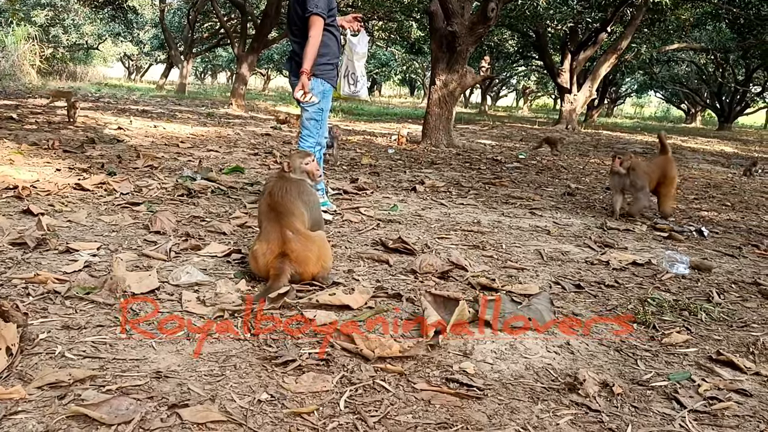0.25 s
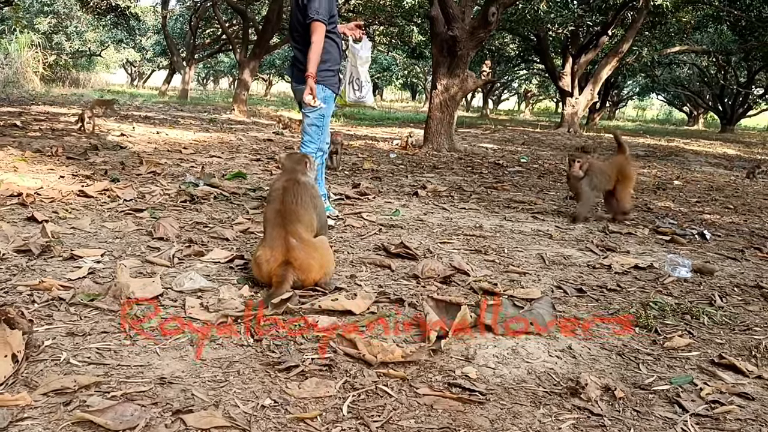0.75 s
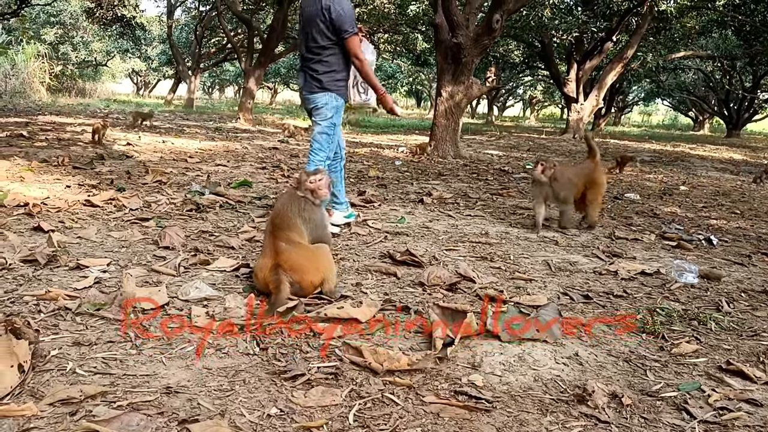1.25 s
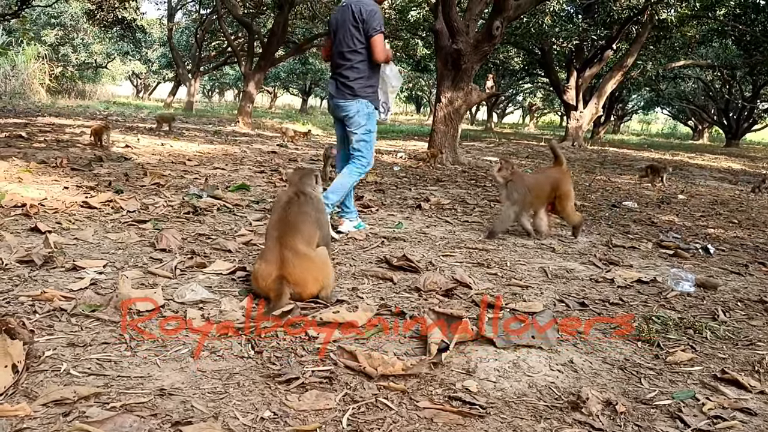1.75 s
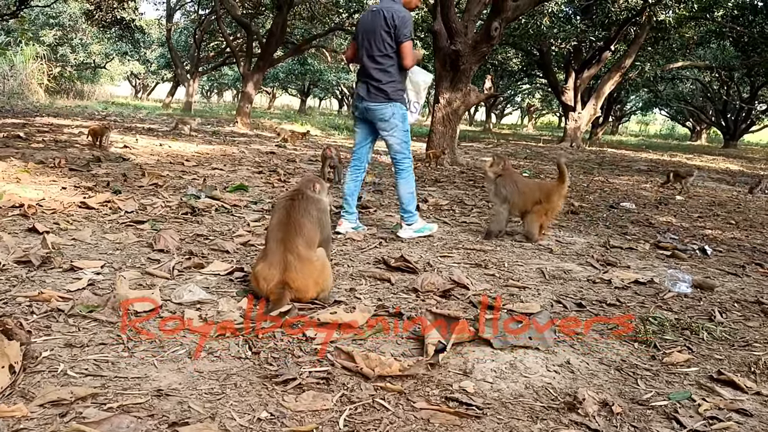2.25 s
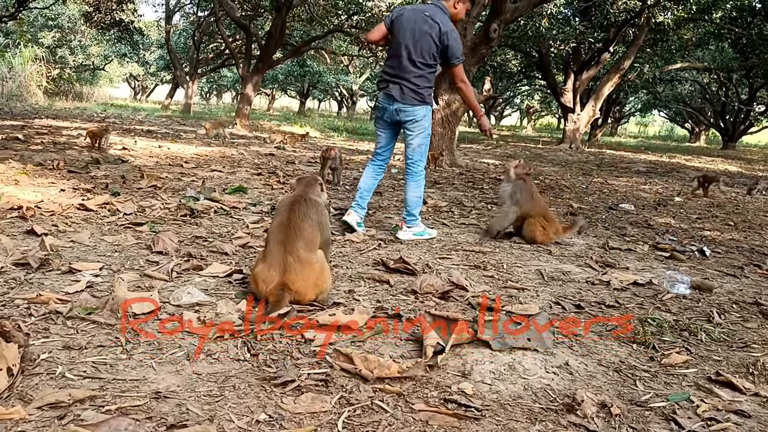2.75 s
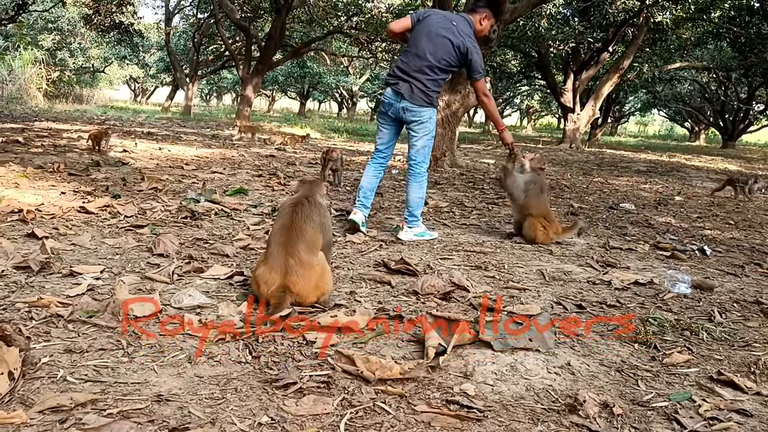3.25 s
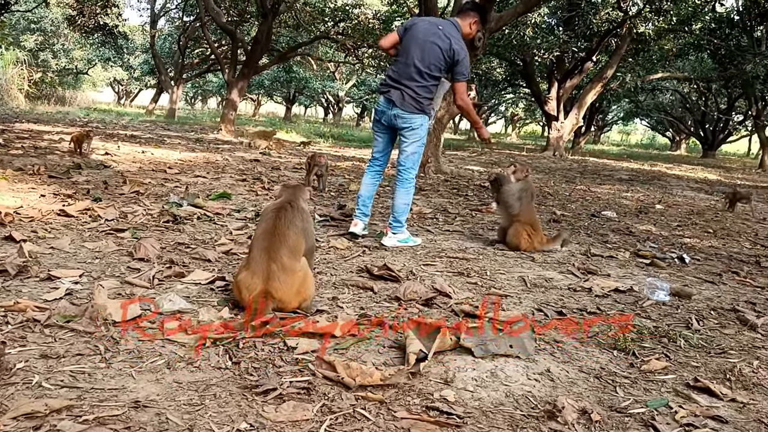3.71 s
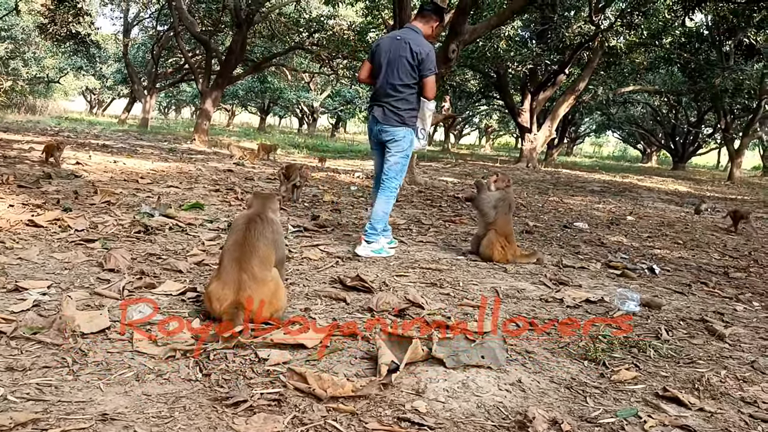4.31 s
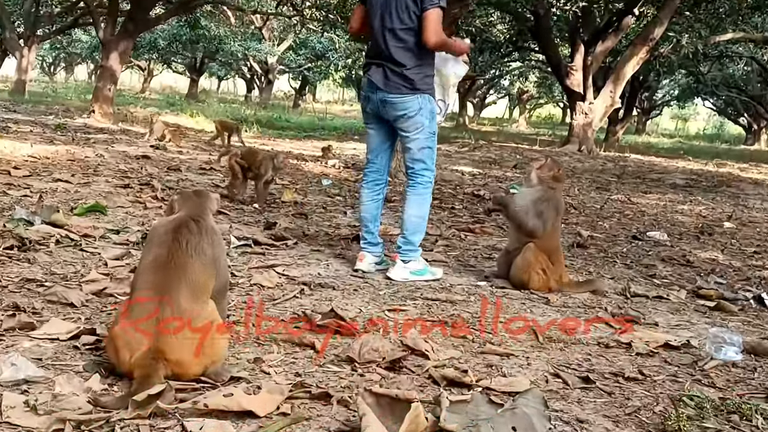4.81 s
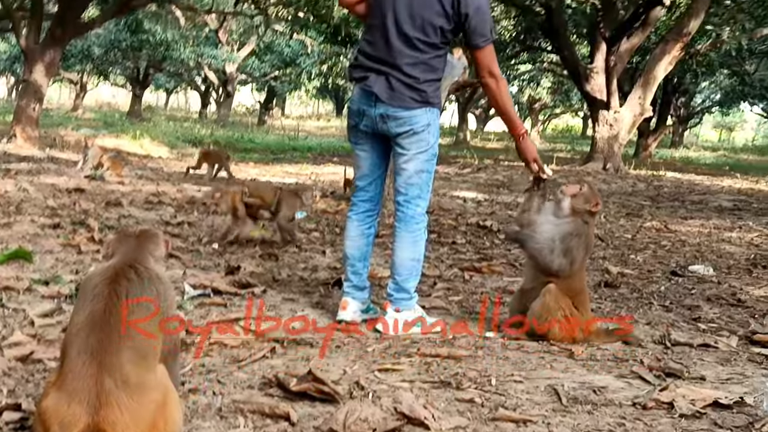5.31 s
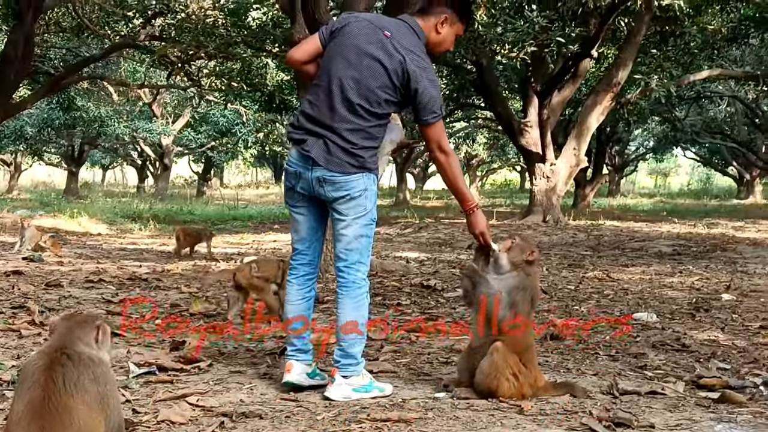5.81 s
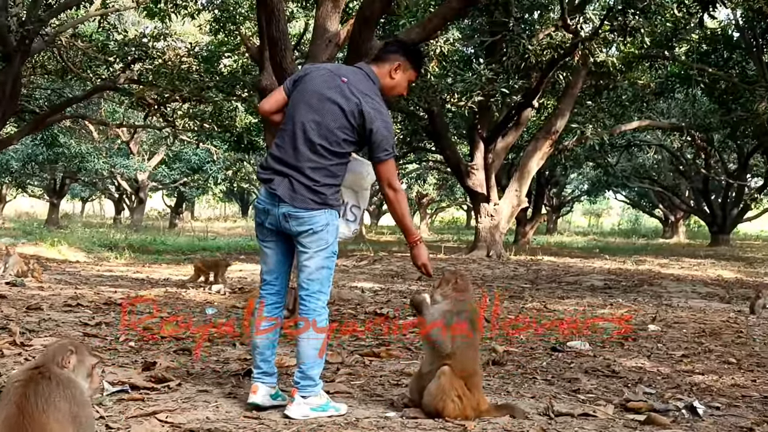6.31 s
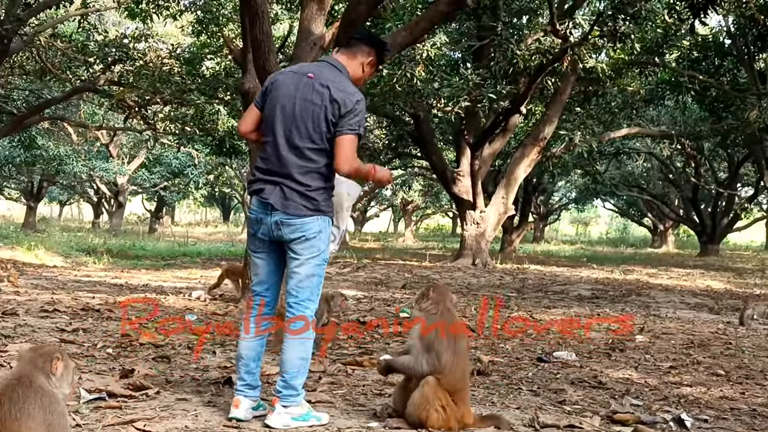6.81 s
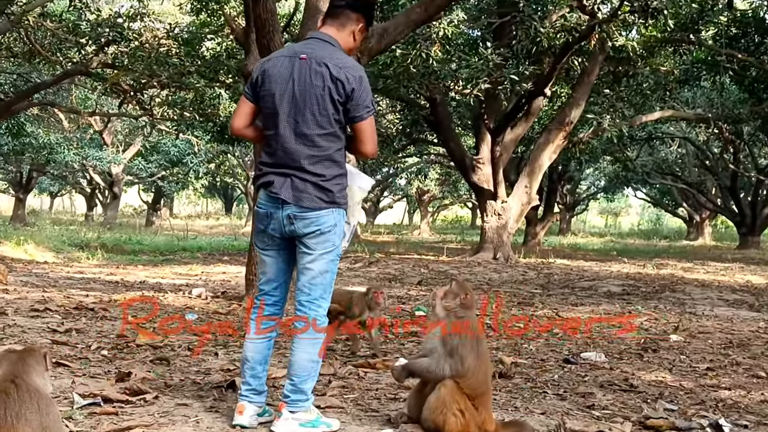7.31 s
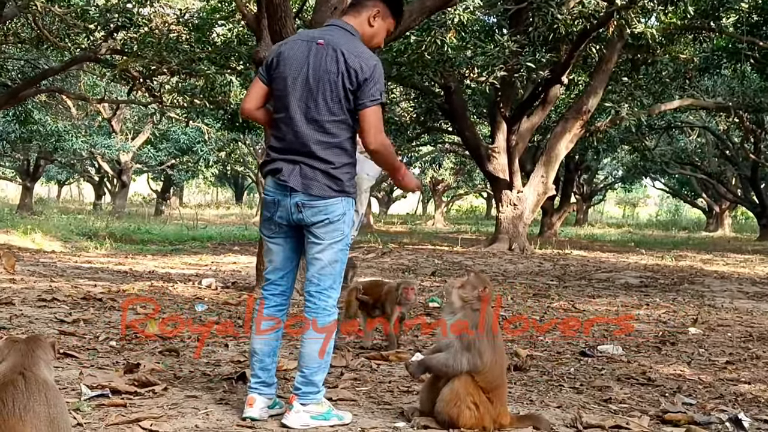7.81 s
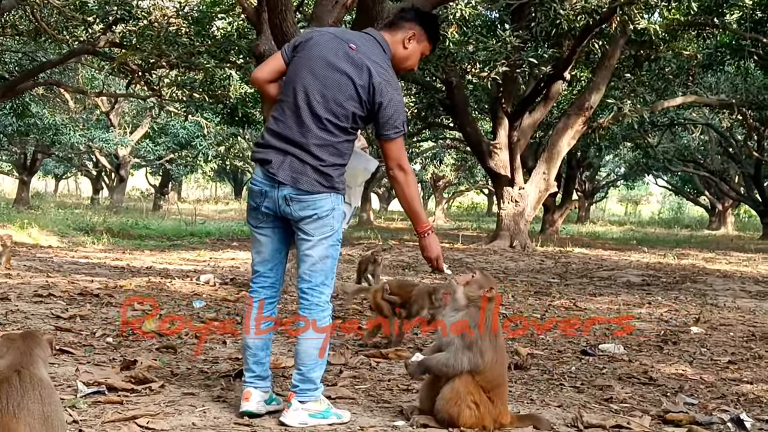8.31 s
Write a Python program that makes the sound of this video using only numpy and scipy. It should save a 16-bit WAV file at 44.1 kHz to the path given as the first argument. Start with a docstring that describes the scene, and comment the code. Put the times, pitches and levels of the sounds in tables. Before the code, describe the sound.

A quiet orchard with rustling canopy, short echoes among trees and a faint idling engine far away. A monkey coo is already fading at 0 s; clear arched coos follow around 1.1, 1.6 and 2.8 s, with tiny squeaks at 1.1 and 2.1. Dry leaves scuff lightly, strongest early near 1.5, and a twig snaps sharply at 2.0. A thin fluttering insect buzzes in bouts from 2.9 to 5 s. Two tiny shrill yelps flick by at 3.4, a lower coo at 3.6, leaf crunch at 4.3, another coo at 4.4, then a breathy squeal breaking into a yelp at 4.9. Coos return at 6.3 and, higher and brief, at 7.9. Faint birds chirp throughout, with a clearer peep at 7.3. The hand-covered right microphone rumbles and thumps, notably at 0.2, 3.0, 6.3 and 8.3. The engine swells gently; leaves and twigs crackle loudly at 8.3.

```python
"""An orchard through two microphone ports: the left is open, a hand covers the right and muffles it.
From the start monkeys coo in bent arches, dry leaves crackle underfoot, the canopy rustles and an engine
idles far off as pulses in a pipe. The grip rumbles on the covered port and fingers bump the case.
Twigs snap as short rings, then small birds sing gliding tones and squeaks pass; near 2.9 s an insect buzzes.
From 3.4 s monkeys yelp and squeal in fluttering partials with breath; the engine is nearest at the end."""
import sys
import numpy as np
from scipy import signal
from scipy.fft import rfft, irfft, next_fast_len
from scipy.io import wavfile
from scipy.ndimage import uniform_filter1d, map_coordinates

SR = 44100
rng = np.random.default_rng(int(sys.argv[2]) if len(sys.argv) > 2 else 0)


def decibels_to_gain(level_db):
    """Convert a level in decibels to a linear amplitude gain (20 dB per decade)."""
    exponent = np.asarray(level_db, float) / 20
    return 10 ** exponent


def generate_wav(sig):
    """Save sig (samples, or channels by samples) to the path in sys.argv[1] as 16-bit PCM at SR."""
    pcm = np.round(np.clip(np.atleast_2d(sig).T, -1, 1) * 32767).astype(np.int16)
    wavfile.write(sys.argv[1], SR, pcm)


N = 377055
TIME = np.arange(N) / SR

# Colours of dry leaves underfoot, in low, middle and treble bands: (frequency [Hz], relative level [dB per Hz])
LEAF_BANDS = [
    [(700, -9.5), (1100, 15), (1900, 13.5), (2300, -36)],
    [(1700, -10.5), (2200, -1.5), (3600, 9), (4400, 1.5), (5200, -20), (7000, -37.5), (8000, -72.5)],
    [(7500, -27.5), (10000, 14.5), (13000, 32.5), (16000, -14.5)],
]


def unit(x):
    """Scales a signal to rms 1."""
    return x / np.sqrt(np.mean(x ** 2) + 1e-20)


def along(points, hz):
    """Interpolates (Hz, value) points on a log frequency axis."""
    f, v = np.transpose(points)
    return np.interp(np.log(hz + 1), np.log(f + 1), v)


def curves(rows, t=TIME):
    """Gives one value per sample for each column after the time."""
    s, *cols = np.transpose(rows)
    return [np.interp(t, s, c) for c in cols]


def wobble(rate, size=N):
    """Draws a smooth random curve with rate knots a second, at most 2000."""
    knots = rng.standard_normal(int(size * 2000 / SR) + 9)
    return map_coordinates(knots, [np.arange(size) * min(rate, 2000) / SR])


def filtered(x, response):
    """Multiplies the spectrum of x by a response of frequency."""
    m = next_fast_len(N + 8192)
    return irfft(rfft(x, m) * response(np.fft.rfftfreq(m, 1 / SR)), m)[..., :N]


def noise(spectrum):
    """Makes noise of rms 1 with the given colour."""
    return unit(filtered(rng.standard_normal(N), lambda hz: decibels_to_gain(along(spectrum, hz))))


def patchy(x, patchy_db):
    """Varies the gain in random patches of time and frequency."""
    z = signal.stft(x, nperseg=1024)[2]
    field = uniform_filter1d(rng.standard_normal(z.shape), 7, 0)
    field = uniform_filter1d(field, 9, 1)
    return signal.istft(z * decibels_to_gain(patchy_db * unit(field)), nperseg=1024)[1][:N]


def notes(tables, voice, fade, glide):
    """Plays each table with a voice; the pitch rounds its corners over glide seconds."""
    out = np.zeros(N + SR)
    for rows in tables:
        start, end = rows[0][0], rows[-1][0] + fade
        t = np.arange(round(start * SR), round(end * SR)) / SR
        hz, *cols = curves(rows, t)
        hz = uniform_filter1d(hz, 1 + int(glide * SR), mode="nearest")
        edge = np.clip(np.minimum(t - start + 1 / SR, end - t) / fade, 0, 1)
        phase = 2 * np.pi * np.cumsum(hz) / SR
        out[round(start * SR):][:len(t)] += edge * voice(phase, hz, *cols)
    return out[:N]


def coo(phase, hz, db, overtones_db, loss_db):
    """A clean tone with a slight tremor; the mouth colours its three overtones."""
    # Mouth: (frequency [Hz], gain on overtones [dB])
    mouth = [(1300, -1), (1900, -3), (2350, 0.5), (2750, -6), (3400, 8), (3800, 1), (4300, 7), (4750, -14),
             (5300, -28)]
    phase = phase + 0.24 * wobble(60, size=len(hz))
    levels = [db] + [db + overtones_db - loss_db * k + along(mouth, (k + 2) * hz) for k in range(3)]
    partials = [decibels_to_gain(level + wobble(40, size=len(hz))) * np.sin(k * phase) for k, level in enumerate(levels, 1)]
    return np.sqrt(2) * sum(partials)


def arch(start, crest, end, hz, db, overtones_db, loss_db, sag, bend):
    """Effort bends up to the crest and then sags; pitch and level follow, and the mouth opens and closes."""
    rise, rise_shape = .13, 1.7  # share of pitch under the crest at the start, bend of the way up
    rise_db, sag_db = 35, 70  # level lost per share of pitch under the crest, before and after it
    opens_db, open_at = 17, 0.61  # overtone swell; share of the coo at which the mouth is widest
    t = np.linspace(max(start, 0), end, 40)
    under = rise * (np.maximum(crest - t, 0) / (crest - start)) ** rise_shape
    sagged = sag * (10 * np.maximum(t - crest, 0)) ** bend
    shut = (((t - start) / (end - start) - open_at) / open_at) ** 2
    waver = .007 * wobble(14, size=SR)[((t - t[0]) * SR).astype(int)]  # share of pitch
    fade_db = sag_db * sagged
    pitch = hz * (1 - under - sagged + waver)
    level = db - rise_db * under - fade_db
    overtones = overtones_db - opens_db * shut + 0.61 * fade_db
    return np.transpose([t, pitch, level, overtones, loss_db + 0 * t])


def coos():
    """Arched coos of several callers, near and far, and short squeaks that swell and fade on a pitch slide."""
    # Each caller: (overtones [dB], loss per further overtone [dB], pitch share sagged 0.1 s after the crest,
    # bend of the sag), then its coos: (start [s], crest [s], end [s], crest pitch [Hz], level [dB])
    callers = [((-1.5, 12, .055, 2), [(1.57, 1.81, 1.92, 1174, -44.5), (4.41, 4.63, 4.74, 1151, -46.5)]),
               ((0, 33.5, .0158, 3.0), [(2.772, 2.89, 3.18, 1344, -46.5)]), ((-11.5, 10, .005, 0.5),
               [(-.2, .02, 0.23, 1092, -50), (1.09, 1.33, 1.42, 1085, -50), (3.2, 3.36, 4.02, 1047, -76.5),
               (3.6, 3.67, 3.9, 1168, -67), (6.272, 6.385, 6.765, 1191, -49)]), ((-30, 8, .115, 1.1),
               [(3.61, 3.745, 3.95, 727, -48.5)]), ((-7, 19, .17, 1.4), [(7.915, 7.955, 8.04, 1702, -51)])]
    # Squeaks: (time [s], length [s], first pitch [Hz], last pitch [Hz], level [dB])
    squeak_rows = [(1.077, .055, 686, 544, -57.5), (2.086, 0.058, 1544, 1452, -55.5),
                   (7.816, 0.039, 1137, 1360, -53.5)]
    edge_drop_db, overtones_db, loss_db = 7.5, -22, 9
    arches = [arch(*row, *voice) for voice, rows in callers for row in rows]
    squeaks = [[(s + length * u, first + (last - first) * u, db - edge_drop_db * abs(2 * u - 1),
                 overtones_db, loss_db) for u in (0, .5, 1)]
               for s, length, first, last, db in squeak_rows]
    return notes(arches + squeaks, coo, fade=0.0092, glide=0.027)


def scuffs():
    """Feet in dry leaves set off bursts of rough noise in three bands that die away."""
    # Scuffs: (time [s], relative level [dB], t60 [s], here kept within 0.03-0.5 s for the decay,
    # low band against the middle [dB])
    steps = [(0.0044, -44.5, 0.15, -27), (0.2494, -49, 0.14, -14), (0.5232, -47.5, 0.21, -17),
             (0.9094, -53, 0.084, -9), (1.4581, -44, 0.42, -21), (1.522, -41.5, 0.15, -10),
             (2.2985, -44, 0.16, -10), (4.1769, -42.5, 0.17, -27), (4.323, -34, 0.38, -22),
             (5.3118, -40.5, 0.16, -39.5), (5.4386, -42, 0.27, -39), (5.8744, -51, 0.15, -20),
             (8.313, -30.5, 0.64, -31.5), (8.349, -31.5, 0.11, -21.5)]
    treble_db = -27  # against the middle band
    gains, t = np.zeros((3, N + SR)), np.arange(SR // 2) / SR
    for s, db, t60, low_db in steps:
        decay = decibels_to_gain(db - 60 * t / np.clip(t60, .03, .5))
        shape = decay * (1 - np.exp(-t / (0.014 * t60)))
        gains[:, round(s * SR):][:, :len(t)] += decibels_to_gain([[low_db], [0], [treble_db]]) * shape
    grains = unit(decibels_to_gain(2.63 * wobble(500)))
    return decibels_to_gain(-9.0) * grains * sum(g[:N] * noise(band) for g, band in zip(gains, LEAF_BANDS))


def canopy():
    """A breeze rustles the leaves overhead: coloured noise with uneven, patchy gain."""
    # Breeze: (time [s], level [dB])
    breeze = [(0, -66.5), (1.07, -70.5), (1.71, -64.5), (2.05, -71.5), (2.95, -72), (3.64, -68),
              (4.4, -61.5), (4.9, -69.5), (5.1, -63), (5.64, -65.5), (7.6, -65.5), (8.55, -57)]
    # Colour of the leaves overhead: (frequency [Hz], relative level [dB per Hz])
    colour = [(500, -55), (900, 5.5), (1400, 3), (2100, 8.5), (3000, 8), (3800, 11.5), (4400, 1),
              (5000, -14), (6000, -26.5), (7500, -69.5)]
    gusts_db = curves(breeze)[0] + 0.97 * wobble(7.6) + 1.7 * wobble(40)
    return decibels_to_gain(gusts_db) * unit(patchy(noise(colour), patchy_db=1.86))


def engine():
    """One uneven soft pulse per firing rings the exhaust; distance takes its treble."""
    # Engine far off, drawing nearer: (time [s], level [dB])
    approach = [(0, -61.5), (4, -59.5), (7.2, -54), (8.55, -49.5)]
    # Exhaust resonances: (frequency [Hz], width [Hz], relative level [dB])
    pipe_modes = [(121.95, 16, 15), (192, 31, 1.5), (245, 50, -28.5), (350, 60, -59)]
    idle_hz, slows_hz_per_s, first_turn = 23.158, .05354, .305  # firings a second, drift, cycle share at 0 s
    turns = first_turn + (idle_hz - slows_hz_per_s * TIME / 2) * TIME
    fired = np.diff(np.floor(turns), prepend=0)
    pulses = -fired * decibels_to_gain(rng.standard_normal(N))

    def exhaust(f):
        modes = sum(decibels_to_gain(db) * 1j * f * w / (c * c - f * f + 1j * f * w) for c, w, db in pipe_modes)
        return modes / (1 + 1j * f / 300) ** 3

    return decibels_to_gain(curves(approach)[0]) * unit(filtered(pulses, exhaust))


def trees(x):
    """Trunks and canopy answer with a noise tail; each frequency dies at its own speed."""
    # Echo among the trees: (frequency [Hz], t60 [s])
    decays = [(300, 0.53), (1200, 0.34), (3500, 0.43), (10000, 0.16)]
    hz, t, z = signal.stft(rng.standard_normal(SR // 2), SR, nperseg=256)
    tail = signal.istft(z * decibels_to_gain(-60 * t / along(decays, hz)[:, None]), SR, nperseg=256)[1]
    delayed = np.pad(x, (300, 0))  # samples
    return signal.fftconvolve(delayed, tail / np.linalg.norm(tail))[:N]


def hand():
    """Fingers tick the case and swing the sealed cavity, duller for a soft touch; the grip rumbles in lumps."""
    # Finger bumps: (time [s], swing peak [dB], relative tick level [dB], way of the first swing)
    bumps = [(.244, -8, -31, "in"), (0.904, -33, -31.5, "out"), (1.18, -31.5, -64, "in"),
             (1.512, -39, -34, "in"), (1.52, -33, -34.5, "in"), (1.556, -54, -38, "in"),
             (3.031, -3.5, -17.5, "in"), (3.559, -23.5, -67, "out"), (3.755, -32, -73, "in"),
             (3.912, -31.5, -79, "in"), (5.135, -19.5, -71, "in"), (5.245, -44, -43, "in"),
             (5.333, -51, -35, "in"), (5.351, -17.5, -27.5, "out"), (5.386, -42, -36, "in"),
             (5.829, -24, -46, "in"), (6.3, -12.5, -25.5, "in"), (6.335, -26, -37.5, "in"),
             (6.598, -33, -63, "in"), (7.169, -34.5, -72, "out"), (7.892, -23, -49, "in"),
             (8.281, -4, -13.5, "in"), (8.352, -19.5, -32, "in"), (8.443, -25, -51, "in")]
    # Covered cavity, low and high mode: (frequency [Hz], relative level [dB], t60 [s], rise [s])
    cavity = [(65.6, 0, 0.073, 0.0078), (123.4, 0, 0.046, 0.0023)]
    # Colour of the grip's rumble: (frequency [Hz], relative level [dB per Hz])
    rumble = [(15, -0.5), (25, 9.5), (42, 16), (60, 12), (100, -10), (200, -33.5), (400, -80)]
    # The hand shifts: (time [s], half length [s], swell [dB])
    shifts = [(3.1, .12, 2.5), (3.872, 0.43, 12.5), (5.244, 0.29, 8.5), (8.371, .15, 7.5)]
    start_db, settles_db_per_s = -45, 1.38  # the rumble calms as the hand settles
    out, t = np.zeros(N + SR), np.arange(SR // 4) / SR
    pressed = np.maximum(t - .004, 0)
    low, high = [decibels_to_gain(db - 60 * t / t60) * np.cos(2 * np.pi * hz * (t - .008))
                 * (1 - np.exp(-pressed / rise)) ** 2 for hz, db, t60, rise in cavity]
    tick = np.exp(-((t - .005) / 0.00051) ** 2)
    for s, db, tick_db, way in bumps:
        hardness = np.clip((tick_db - db + 44.5) / 22, .3, 1)
        swing = low + hardness * high
        sign = 1 if way == "in" else -1
        bump = decibels_to_gain(db) * swing / swing.max() - decibels_to_gain(tick_db + 1.0) * tick
        out[round(s * SR):][:len(t)] += sign * bump
    swells_db = sum(db * np.exp(-((TIME - s) / half) ** 2) for s, half, db in shifts)
    grip_db = start_db - settles_db_per_s * TIME + swells_db
    lumps = decibels_to_gain(2.7 * wobble(24)) * noise(rumble)
    softened = filtered(out[:N], lambda hz: 1 / (1 + (hz / 1600) ** 4))
    return softened + decibels_to_gain(grip_db) * unit(lumps)


def twigs():
    """Twigs snap dryly: a short ring with a burst of leaf-coloured noise."""
    # Snaps: (time [s], relative level [dB], ring [Hz])
    cracks = [(0.4174, -45.5, 1430), (1.3754, -43, 1070), (1.487, -37.5, 3880), (2.0033, -26, 1514),
              (2.1851, -41, 2490), (2.6377, -50, 3960), (3.4888, -45, 3320), (4.4994, -53, 1100),
              (8.3202, -27, 2190), (8.335, -23, 1310), (8.3422, -24.5, 3210)]
    snaps, t = np.zeros(N + SR), np.arange(900) / SR
    wood = sum(decibels_to_gain(db) * noise(band) for db, band in zip((-3, 0, -20), LEAF_BANDS))
    for s, db, hz in cracks:
        i = round(s * SR)
        shape = decibels_to_gain(db - 60 * t / 0.023) * (1 - np.exp(-t / 0.00009))
        snaps[i:i + 900] += shape * (0.48 * np.sin(2 * np.pi * hz * t) + 0.31 * wood[i:i + 900])
    return decibels_to_gain(-2.5) * snaps[:N]


def birds():
    """One bird repeats a gliding phrase, a little different each time; others peep."""
    # The phrase: (time from its start [s], pitch before variation [Hz], relative level [dB])
    song = [(0, 5600, -4), (0.016, 4630, 8.5), (0.051, 4656, 6), (.062, 5583, -14), (.075, 6250, 0.5),
            (0.096, 4490, -7)]
    # Its repeats: (time [s], relative level [dB])
    repeats = [(0.517, -73), (2.409, -74), (3.711, -75), (5.981, -76), (7.263, -71)]
    # Other birds' peeps: (time [s], pitch [Hz], level [dB])
    peeps = [
        [(3.66, 5540, -87), (3.73, 5960, -84), (3.78, 5680, -79), (3.84, 5900, -84), (3.88, 5600, -93)],
        [(7.28, 2640, -46), (7.295, 2670, -61)],
    ]
    vary = rng.standard_normal((len(repeats), len(song)))
    phrases = [[(s + t, hz * (1 + .02 * v), db + level + 3 * v) for (t, hz, level), v in zip(song, row)]
               for (s, db), row in zip(repeats, vary)]

    def whistle(phase, hz, db):
        return decibels_to_gain(db + 5.7 * wobble(150, size=len(hz))) * np.sin(phase)

    return notes(phrases + peeps, whistle, fade=0.0033, glide=0.0083)


def insect():
    """A thin tone flutters fast; each bout climbs a little and weakens."""
    # Bouts: (time [s], length [s], level at the start [dB])
    bout_rows = [(2.922, 0.47, -52.5), (3.543, .27, -51), (4.098, 0.94, -51.5)]
    buzz_hz, climb_hz, tires_db = 3420, 60.3, 9.5

    def buzz(phase, hz, db):
        return decibels_to_gain(db) * wobble(160, size=len(hz)) * np.sqrt(2) * np.sin(phase)

    bouts = [[(s, buzz_hz, db), (s + length, buzz_hz + climb_hz, db - tires_db)]
             for s, length, db in bout_rows]
    return notes(bouts, buzz, fade=0.084, glide=.03)


def yelp(phase, hz, db, breath_db):
    """Six partials seen through the throat; each flutters, and the treble follows the breath."""
    # Throat: (frequency [Hz], gain [dB])
    throat = [(1000, -36), (1700, -32), (2300, -5), (3000, 9), (3700, 10), (4500, -11.5), (5500, -21),
              (7500, -36), (9000, -49.5), (11000, -19), (14000, -21.5)]
    rough, treble_db = 0.3, 21  # flutter share 0-1; high partials ride this far over the breath
    out = 0
    for k in range(1, 7):
        f = k * hz
        treble = np.clip((f - 4500) / 2000, 0, 1)
        level = db + (breath_db + treble_db - db) * treble
        flutter = 1 - rough + rough * wobble(403, size=len(hz))
        out = out + decibels_to_gain(along(throat, f) + level) * flutter * np.sin(k * phase)
    return out


def monkeys():
    """Shrill voices on a rush of breath, which is coloured noise of unsteady level."""
    # Yelps and a squeal that breaks into a yelp: (time [s], pitch [Hz], level [dB], relative breath level [dB])
    yelps = [
        [(3.371, 1635, -47.5, -69.5), (3.375, 1680, -33, -71.5), (3.381, 2202, -21, -60.5),
         (3.387, 2215, -32.5, -68.5)],
        [(3.397, 1545, -41, -76), (3.4, 1587, -24, -86), (3.408, 1928, -30.5, -82.5), (3.418, 1607, -41, -73),
         (3.424, 1770, -54.5, -74.5)],
        [(4.865, 1755, -74, -89), (4.895, 1922, -74, -70.5), (4.92, 2244, -42, -47), (4.96, 2342, -56, -45),
         (4.988, 2317, -55, -41.5), (5.005, 1913, -25.5, -38.5), (5.011, 1241, -25, -40),
         (5.022, 1190, -28.5, -50.5), (5.04, 1189, -42, -59.5)],
    ]
    # Colour of the breath: (frequency [Hz], relative level [dB per Hz])
    breath_colour = [(1500, -50), (2300, -13), (3100, 4.5), (3700, -11), (5400, -11.5), (8000, -29.5),
                     (9800, -9.5), (12000, -1.5), (15800, -11.5)]
    gain = notes(yelps, lambda *cols: decibels_to_gain(cols[-1]), fade=0.0045, glide=0)
    breath = gain * noise(breath_colour) * decibels_to_gain(4.3 * wobble(170))
    return notes(yelps, yelp, fade=0.0054, glide=0.0051) + breath


def scene():
    """The air reaches the open left port whole and the covered right port through the hand."""
    # Passage through the hand: (frequency [Hz], gain [dB])
    cover = [(100, -2), (250, -4), (700, -20), (1200, -27), (2200, -48), (8000, -55)]
    calls, shrill, song = coos(), monkeys(), birds()
    crackle = scuffs() + twigs()
    echoes = trees(decibels_to_gain(-14) * calls + decibels_to_gain(-4.5) * shrill + decibels_to_gain(-5) * song + decibels_to_gain(-10.0) * crackle)
    air = decibels_to_gain(3.5) * (calls + shrill + song + crackle + echoes + insect() + canopy() + engine())
    muffled = filtered(air, lambda hz: decibels_to_gain(along(cover, hz)))
    return np.array([air, muffled + hand()])


def band_limit(x):
    """A steep low-pass at the top of the band."""
    return signal.sosfilt(signal.butter(12, 16230, fs=SR, output="sos"), x)


def record(dry):
    """Each microphone port adds its own steady background; the mix is cut at the band limit."""
    # Background of the left and right port: (frequency [Hz], level [dB per Hz])
    backgrounds = [
        [(25, -89.5), (45, -87), (100, -73), (250, -90), (420, -100), (800, -105), (3000, -112), (6000, -130),
         (8000, -131), (11000, -121), (13000, -117), (15800, -116)],
        [(25, -100), (250, -91), (400, -103), (700, -107), (1200, -112), (2000, -116), (3500, -120),
         (5000, -126), (8000, -132), (11000, -129), (13000, -124), (15800, -123)],
    ]
    top_hz = 15850
    white = rng.standard_normal((2, N)) * np.sqrt(SR / 2)
    hiss = filtered(white, lambda hz: decibels_to_gain([along(port, hz) for port in backgrounds]))
    mix = filtered(dry + hiss, lambda hz: hz < top_hz)
    return band_limit(mix)


dry = scene()
out = record(dry)
generate_wav(out)
```